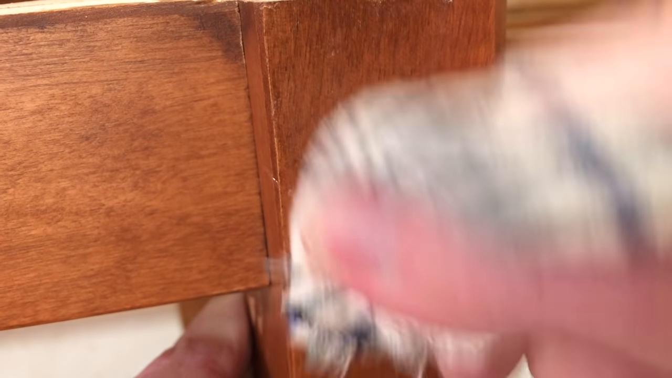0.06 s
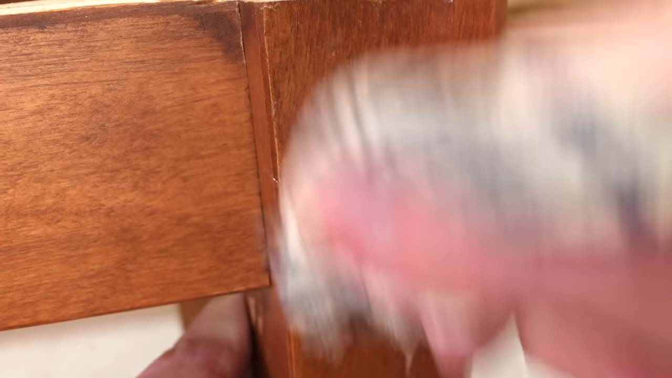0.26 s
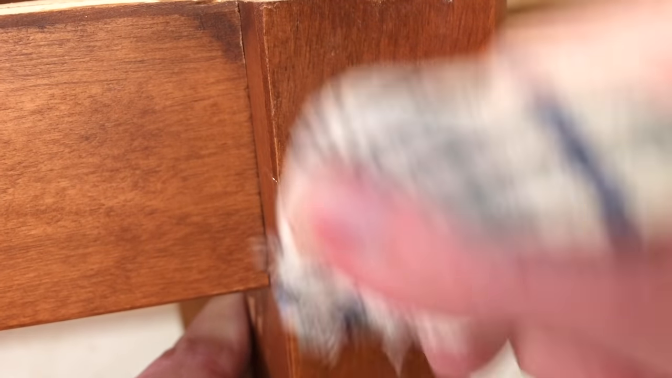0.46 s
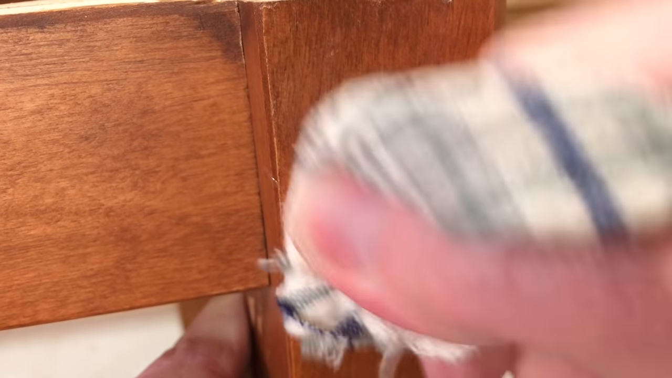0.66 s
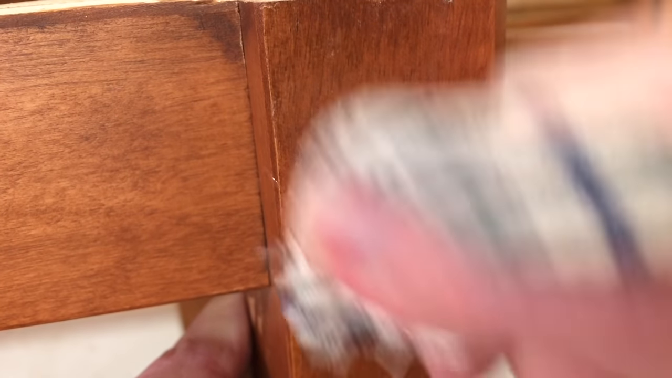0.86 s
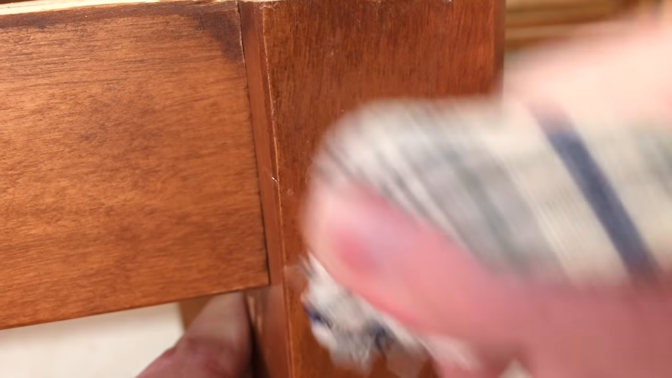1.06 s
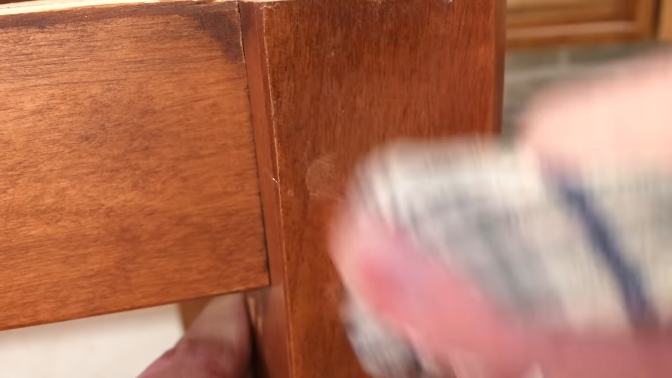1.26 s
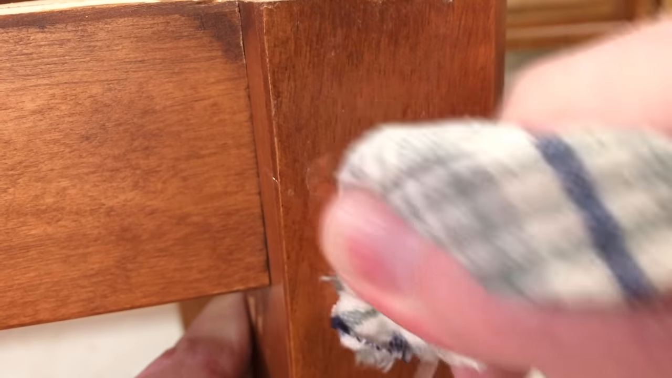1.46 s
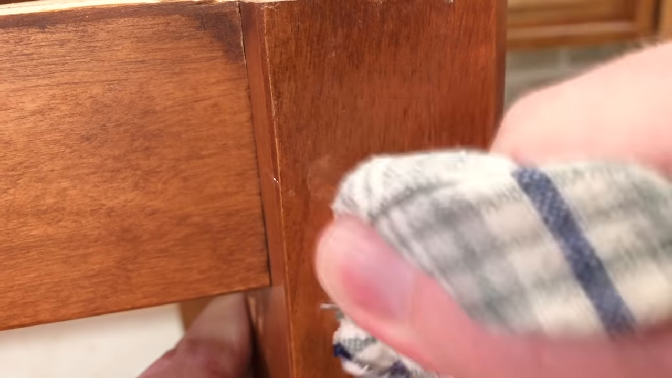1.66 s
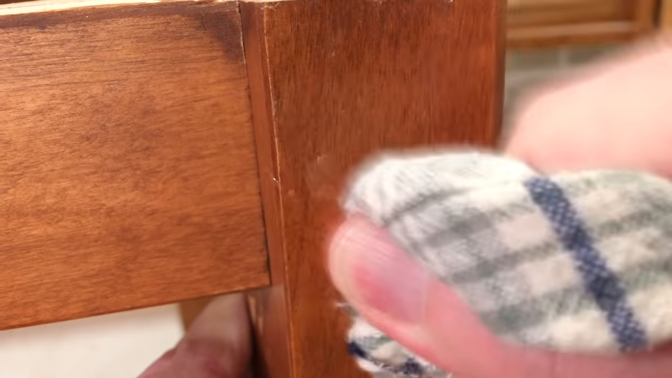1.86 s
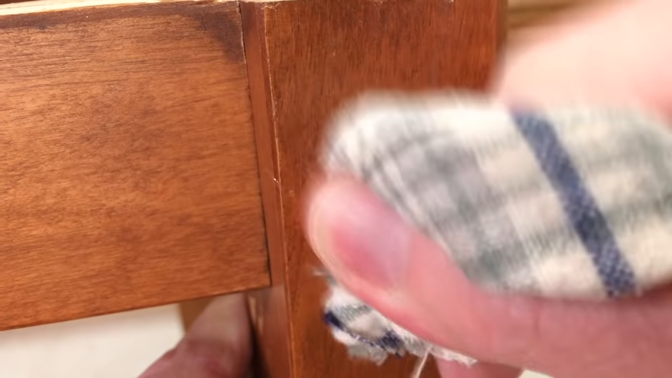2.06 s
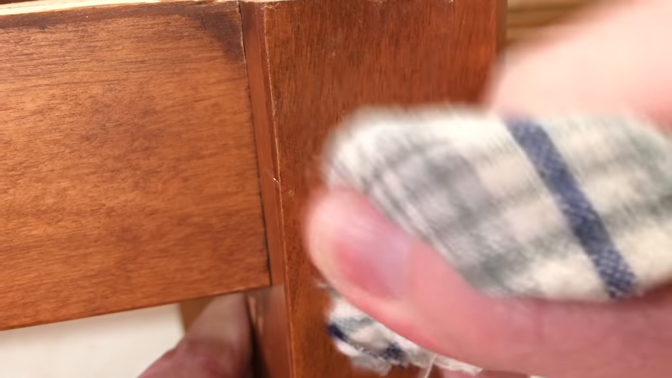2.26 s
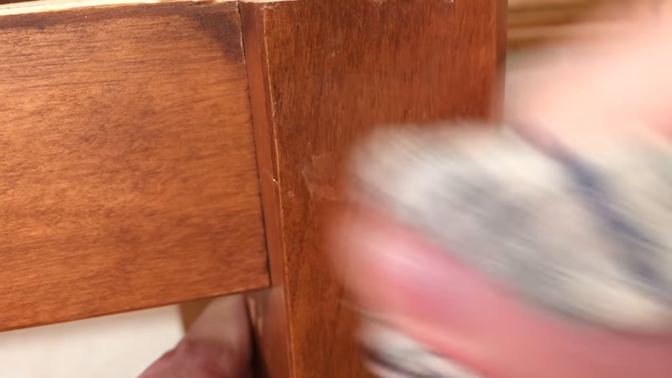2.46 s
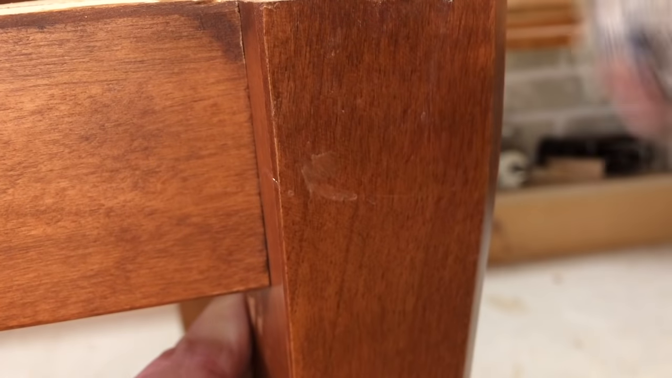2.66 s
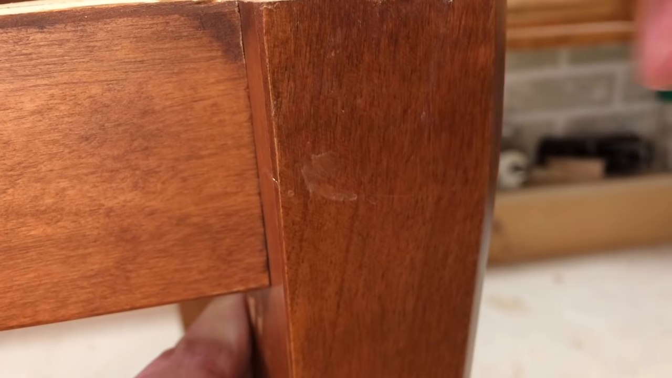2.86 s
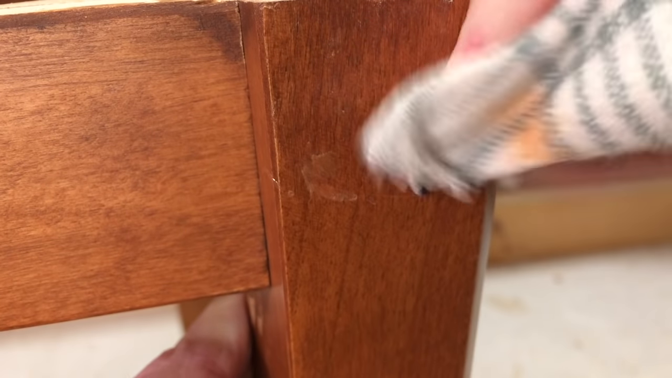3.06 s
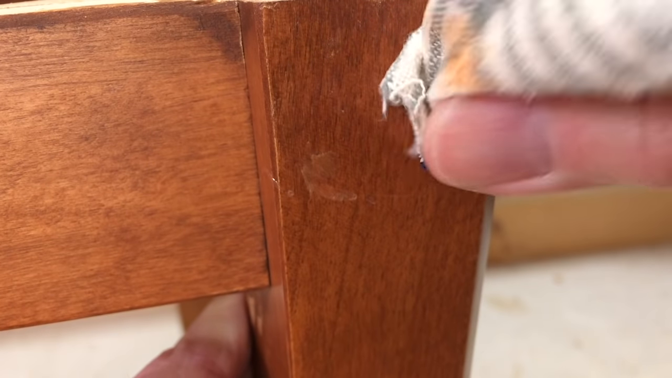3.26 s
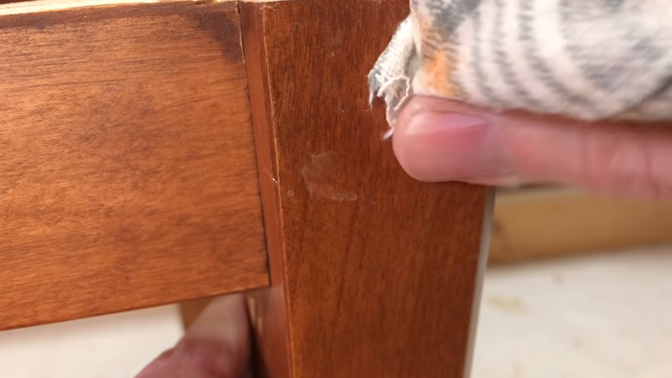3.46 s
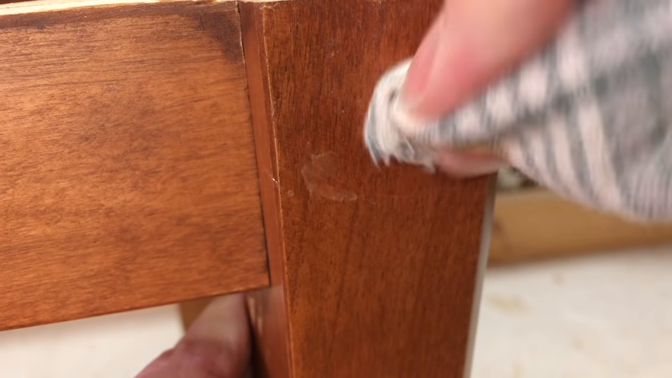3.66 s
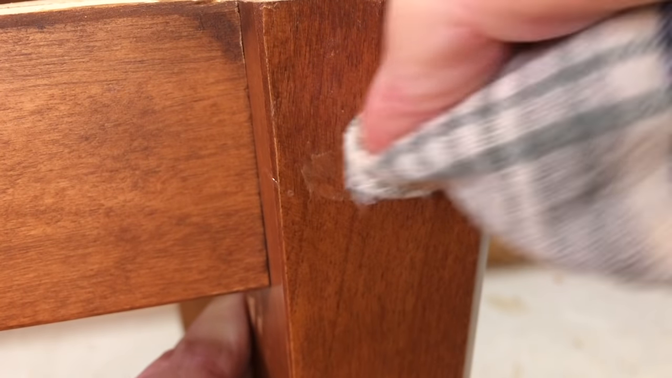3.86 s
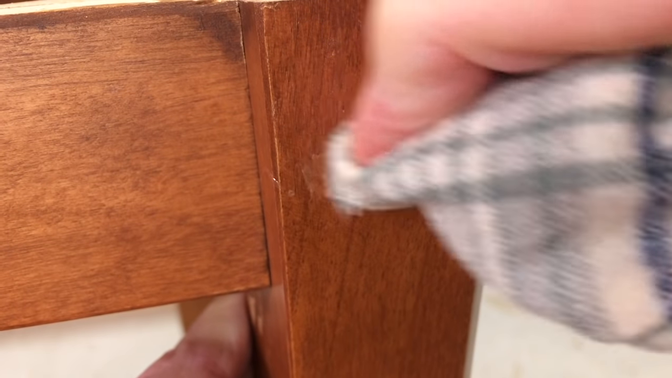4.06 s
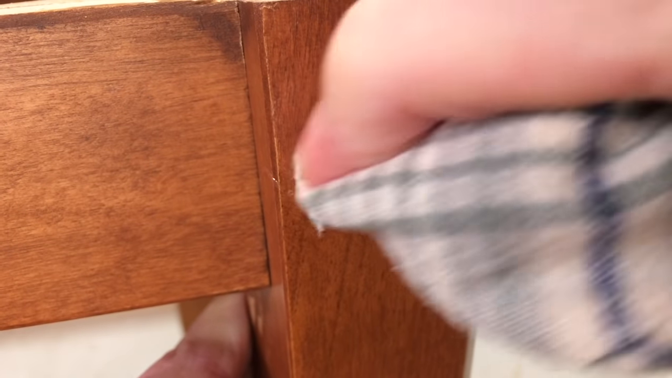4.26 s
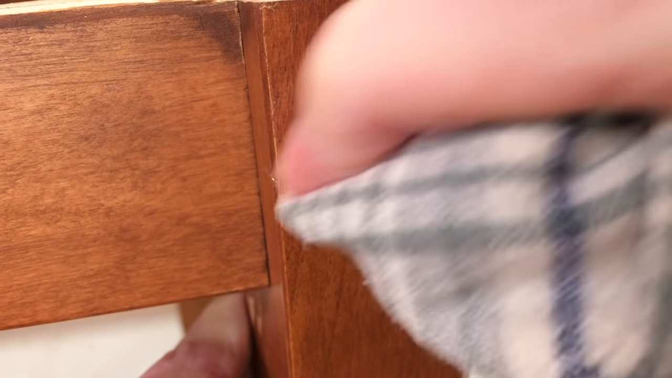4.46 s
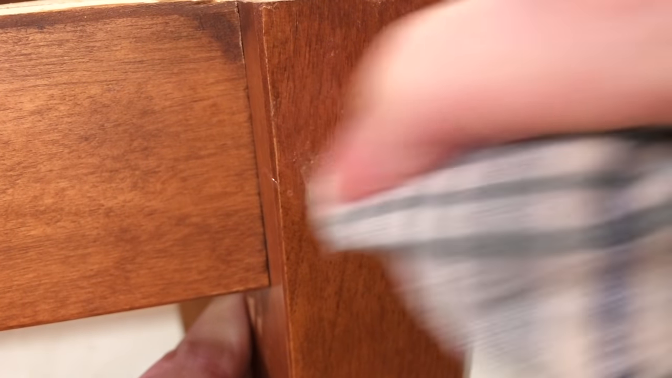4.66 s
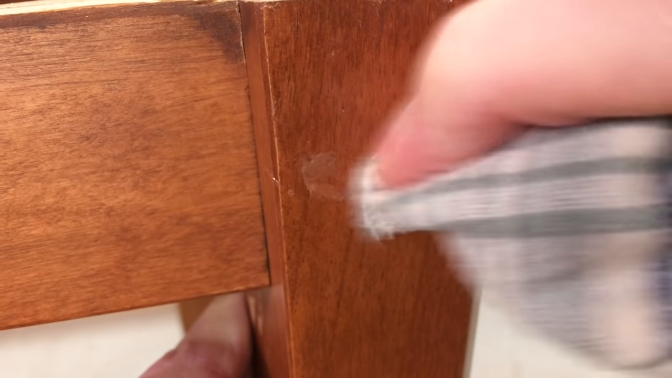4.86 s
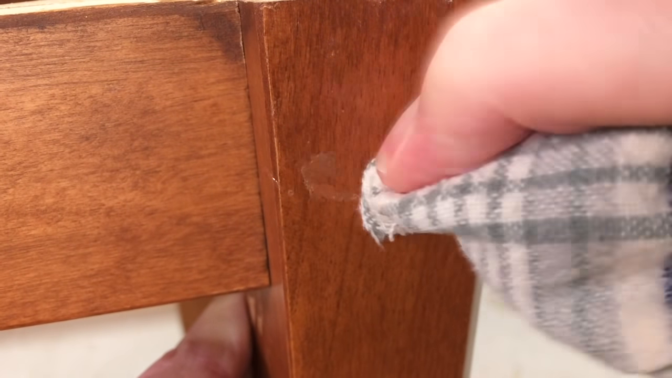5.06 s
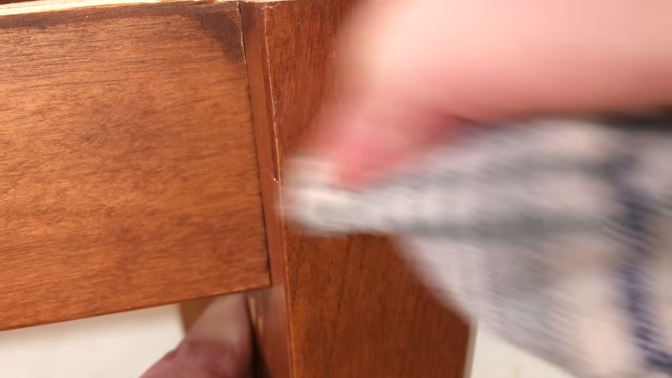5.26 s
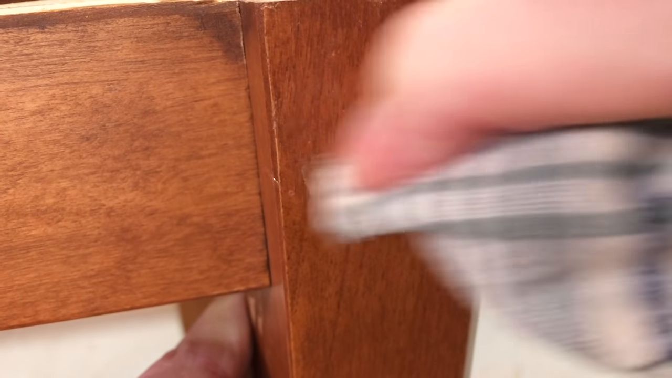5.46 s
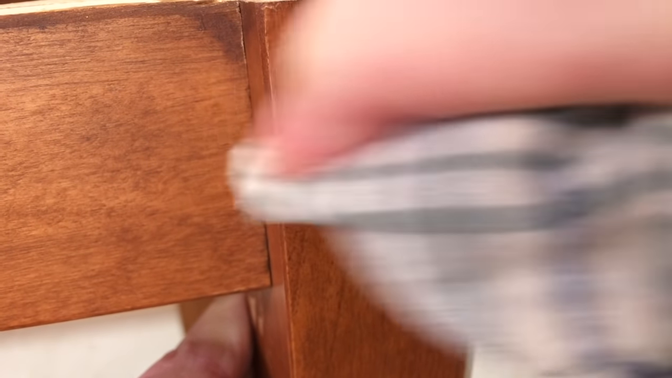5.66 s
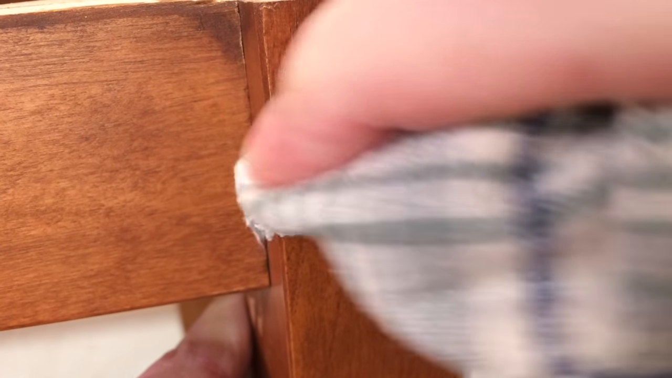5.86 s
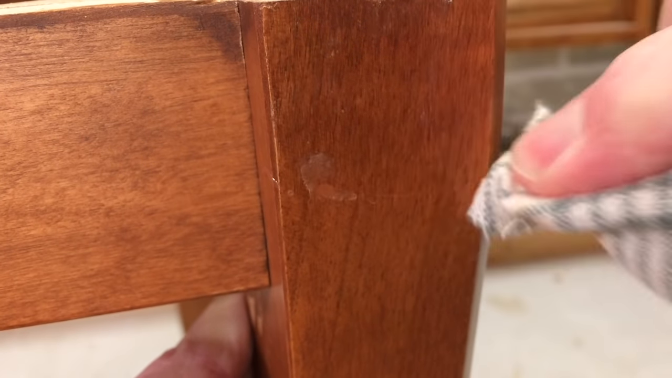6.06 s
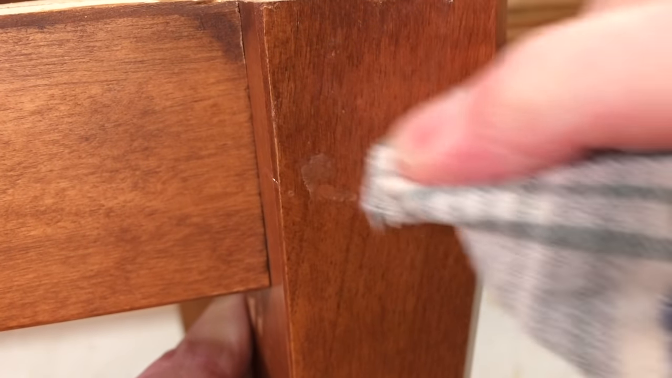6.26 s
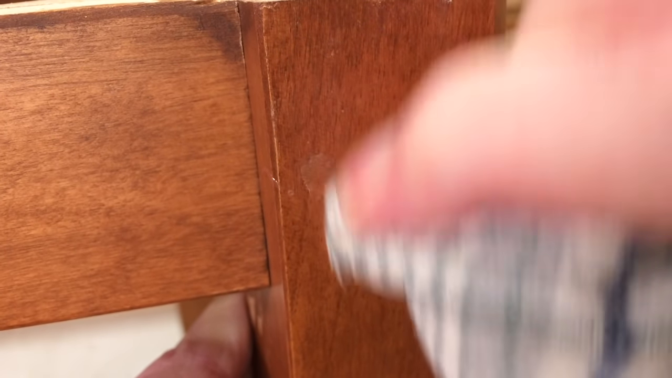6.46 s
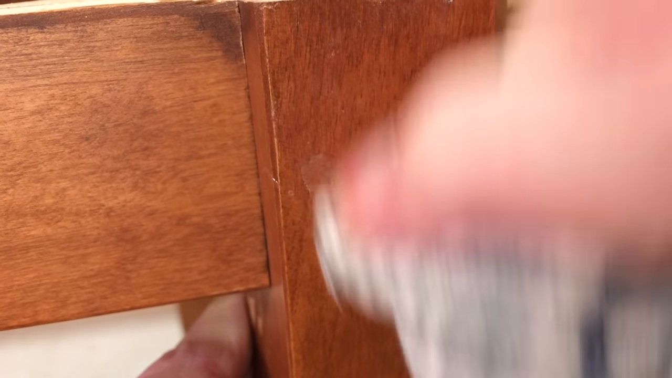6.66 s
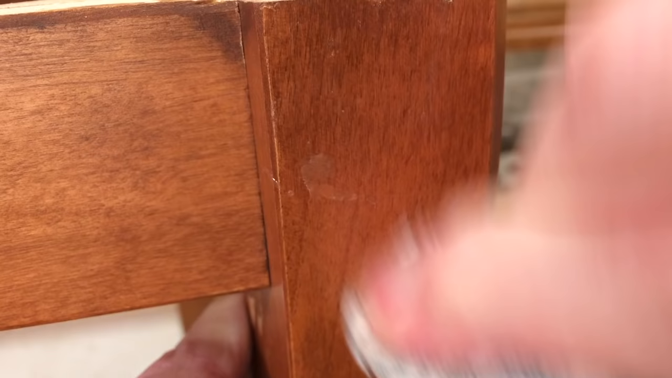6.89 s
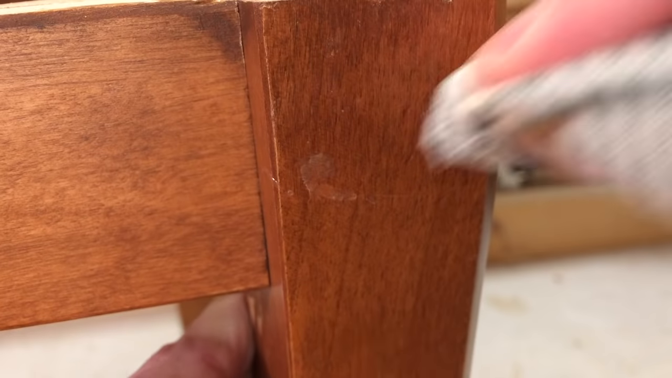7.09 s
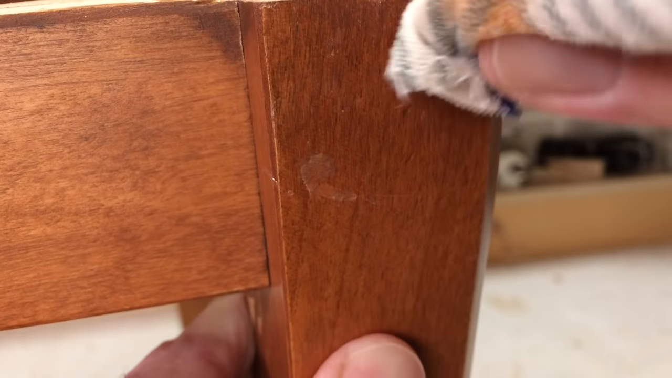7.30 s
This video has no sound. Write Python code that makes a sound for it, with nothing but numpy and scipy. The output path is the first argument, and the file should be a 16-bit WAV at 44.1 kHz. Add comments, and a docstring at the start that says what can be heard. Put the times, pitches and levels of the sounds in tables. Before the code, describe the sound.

A cotton rag rubs rapidly back and forth on a wooden chair leg in three bouts, hissing and scraping, with dull bumps.

```python
"""Buffing a chair leg

A quiet workshop, the microphone close to a varnished chair leg buffed with a bunched cotton rag.
Each stroke hisses in the weave and scrapes the wood into ringing; the cloth groans and squeaks.
The frame judders and bumps under the hand, which also fans slow waves of air at the microphone.
Midway the rag is regripped, with light brushes and taps, then one finger works it over a small spot."""
import sys
import numpy as np
from scipy import signal
from scipy.fft import rfft, irfft
from scipy.io import wavfile

SR = 44100
rng = np.random.default_rng(int(sys.argv[2]) if len(sys.argv) > 2 else 0)


def inscribe(sig):
    """Save sig as 16-bit PCM at rate SR to the path in sys.argv[1].

    A 1-D sig is mono; a 2-D sig holds one channel per row.
    Samples are clipped to [-1, 1] before scaling.
    """
    pcm = np.round(np.clip(np.atleast_2d(sig).T, -1, 1) * 32767)
    wavfile.write(sys.argv[1], SR, pcm.astype(np.int16))


N = 323253
TIME = np.arange(N) / SR


def from_db(db):
    """Decibels to gain."""
    return 10 ** (np.asarray(db) / 20)


def unit_rms(x):
    """Scale to an rms of 1."""
    return x / np.sqrt(np.mean(x ** 2) + 1e-20)


def in_time(rows):
    """Join (time, value) points by straight lines."""
    return np.interp(TIME, *np.transpose(rows))


def butter(x, hz, kind="low", order=2):
    """Butterworth filter."""
    return signal.sosfilt(signal.butter(order, hz, kind, fs=SR, output="sos"), x)


def colour(x, spectrum):
    """Give a steady signal a smooth spectrum; rms 1."""
    hz, db = np.transpose(spectrum)
    bins = np.maximum(np.fft.rfftfreq(N, 1 / SR), 1)
    gain = from_db(np.interp(np.log(bins), np.log(hz), db))
    return unit_rms(irfft(rfft(x) * gain, N))


def drift(per_s):
    """A random curve with a spread near 1."""
    points = rng.standard_normal(N // 10)
    return np.interp(TIME * per_s, np.arange(len(points)), points)


def waver(swing_db, per_s):
    """A gain that wanders up and down by at most swing_db."""
    return from_db(swing_db * np.tanh(drift(per_s)))


def snags(per_s, spread_db=0):
    """Threads catch and let go: random clicks, uneven in size if given a spread."""
    sizes = from_db(spread_db * np.minimum(rng.exponential(1, N), 4))
    signs = rng.choice([-1, 1], N)
    return unit_rms(sizes * signs * (rng.random(N) < per_s / SR))


def swell(start, length, skew):
    """Speed through one stroke: zero at both turns, fastest early if skew is under 1."""
    speed = np.zeros(N)
    during = slice(*np.searchsorted(TIME, [start, start + length]))
    progress = (TIME[during] - start) / length
    speed[during] = np.abs(np.sin(np.pi * progress ** skew))
    return speed


# Room tone of the workshop: (frequency [Hz], relative level [dB])
ROOM_SPECTRUM = [(60, 2), (110, -7.5), (180, -8.5), (240, -10.5), (330, -16), (900, -20), (1400, -24),
                 (3000, -30.5), (10000, -38.5), (15500, -41)]


def room_tone(level_db):
    """The workshop's steady, low hush behind the close sounds."""
    return from_db(level_db) * colour(rng.standard_normal(N), ROOM_SPECTRUM)


# Air stirred by the hand, at the microphone: (time [s], relative level [dB])
DRAUGHT_LEVEL = [(0.05, -30.5), (2.5, -35), (3.4, -44.5), (4.1, -36.5), (5.3, -30.5), (6.1, -37),
                 (7.28, -37.5)]
# Rumble of its eddies: (frequency [Hz], relative level [dB])
EDDY_SPECTRUM = [(8, 13.5), (20, 0), (39, -18), (64, -24.5), (120, -39), (300, -101)]


def fanned_air(push, smooth_hz, eddies_db, gust_db):
    """The hand pushes and pulls the air at the microphone; the eddies shift by gust_db at full push."""
    wave = signal.sosfiltfilt(signal.butter(2, smooth_hz, fs=SR, output="sos"), push)
    effort = np.abs(push) / np.abs(push).max()
    eddies = colour(rng.standard_normal(N), EDDY_SPECTRUM)
    return wave + from_db(in_time(DRAUGHT_LEVEL) + eddies_db + gust_db * effort) * eddies


def ring(x, hz, t60):
    """One mode: a unit click starts a decaying sine of height 1."""
    radius, angle = from_db(-60 / (t60 * SR)), 2 * np.pi * hz / SR
    return signal.lfilter([0, np.sin(angle)], [1, -2 * radius * np.cos(angle), radius ** 2], x + 1e-18)


# Modes of the chair: (frequency [Hz], relative level [dB], t60 before hand damping [s])
CHAIR_MODES = [(82.7, -1, 0.44), (104.7, -1.5, 0.47), (138, -2.5, 0.37), (190, -0.5, 0.16),
               (231.9, -3, 0.22), (274, -5.5, 0.11), (333, -7, 0.15), (372.7, -5, 0.13), (455, -8.5, 0.12),
               (586, -12, 0.094), (660, -9, 0.062), (868, -9, 0.04), (1020.5, -9.5, 0.086),
               (1074, -16, 0.076), (2833, -16.5, 0.035), (2968, -18.5, 0.067), (4346, -18.5, 0.037),
               (5000, -21, 0.072)]


def chair(force, damping=1, wander_db=0):
    """The frame rings. A firm hand damps it; a travelling contact favours the modes by turns."""
    out = 0
    for k, (hz, db, t60) in enumerate(CHAIR_MODES):
        coupling = waver(wander_db, per_s=14) if wander_db else 1
        out += (-1) ** k * from_db(db) * ring(force * coupling, hz, t60 / damping)
    return out


# How hard the hand shakes the frame: (time [s], relative level [dB])
SHAKE_LEVEL = [(0.0, -54), (0.77, -61), (2.27, -54), (2.53, -64.5), (3.2, -71.5), (4.99, -64.5),
               (5.74, -60), (6.04, -69), (6.5, -63.5), (7.28, -69.5)]


def judder(speed, gain_db, soft_hz, resting_drag):
    """Uneven drag of the padded hand shakes the low modes, most while it moves."""
    drag = snags(per_s=1000) * waver(7.5, per_s=40) * (resting_drag + np.sqrt(speed))
    return from_db(in_time(SHAKE_LEVEL) + gain_db) * unit_rms(chair(butter(drag, soft_hz)))


# The chair rocks as the hand turns: (time [s], relative force [dB])
ROCKINGS = [(0.03, -36), (0.19, -38), (0.826, -37.5), (1.003, -42.5), (1.495, -33.5), (1.708, -35.5),
            (2.385, -44), (4.637, -30.5), (4.874, -35.5), (5.093, -36.5), (5.336, -39.5), (5.528, -34.5),
            (5.743, -39.5)]


def bumps(gain_db, band_hz, gap_s, lead_db, rebound_db, contacts=6):
    """The chair rocks on its feet: a light touch, a dull knock and a few weaker rebounds."""
    force = np.zeros(N)
    contact_db = np.append(lead_db, rebound_db * np.arange(contacts - 1))
    for knock_s, db in ROCKINGS:
        elapsed = gap_s * np.cumsum(rng.uniform(0.559, 1.5, contacts))
        times = np.maximum(knock_s + elapsed - elapsed[1], 0)  # the second contact is the knock
        force[(times * SR).astype(int)] += from_db(db + contact_db)
    return from_db(gain_db) * chair(butter(force, band_hz, "band"), damping=3.8)


# Three bouts close to the microphone: the whole wad, one fingertip, then a short finish.
# Strokes go up and down in turn: (start [s], length [s], relative hiss [dB], relative scrape [dB])
WAD_BOUT = [(0.042, 0.11, -56, -66), (0.125, 0.14, -56, -56.5), (0.24, 0.11, -53.5, -58.5),
            (0.33, 0.13, -57, -58.5), (0.45, 0.11, -58, -60.5), (0.538, 0.095, -63, -57),
            (0.636, 0.12, -55.5, -65), (0.723, 0.16, -55.5, -60.5), (0.862, 0.11, -56.5, -61),
            (0.953, 0.11, -59, -58), (1.054, 0.12, -56, -59), (1.159, 0.14, -52.5, -60.5),
            (1.293, 0.1, -55.5, -63), (1.395, 0.11, -59.5, -54), (1.503, 0.11, -56.5, -60.5),
            (1.6, 0.13, -57.5, -52.5), (1.718, 0.11, -54.5, -59), (1.814, 0.14, -56, -59.5),
            (1.931, 0.089, -56.5, -58), (2.034, 0.1, -59, -55.5), (2.129, 0.097, -57, -58),
            (2.234, 0.097, -58, -58.5), (2.336, 0.089, -59.5, -59)]
FINGERTIP_BOUT = [(4.203, 0.18, -64, -58), (4.302, 0.16, -65.5, -62.5), (4.449, 0.16, -62.5, -58.0),
                  (4.545, 0.14, -65.5, -58), (4.685, 0.12, -61, -54.5), (4.774, 0.15, -62, -55.5),
                  (4.908, 0.14, -60.5, -56), (4.997, 0.18, -63, -56), (5.151, 0.11, -60.5, -56.5),
                  (5.234, 0.11, -68, -59.5), (5.357, 0.11, -59.5, -56.5), (5.433, 0.17, -63, -54.5),
                  (5.575, 0.12, -60.5, -54.5), (5.672, 0.14, -63.5, -56), (5.804, 0.14, -58.5, -55.5)]
FINISH_BOUT = [(6.335, 0.17, -63.5, -60.5), (6.462, 0.11, -61, -58.5), (6.56, 0.11, -59.5, -58.5),
               (6.657, 0.13, -60.5, -57.5), (6.755, 0.14, -59, -60)]


def strokes(hiss_power, scrape_power, air_lag_s):
    """Hiss gain, scrape gain and push on the air; rubbing sets in fast and levels off as the rag slides."""
    hiss, scrape, push = np.zeros((3, N))

    def rub(bout, push_db, hiss_skew, scrape_skew):
        for k, (start, length, hiss_db, scrape_db) in enumerate(bout):
            hiss[:] += from_db(hiss_db) * np.tanh(2 * swell(start, length, hiss_skew) ** hiss_power)
            scrape[:] += from_db(scrape_db) * np.tanh(2 * swell(start, length, scrape_skew) ** scrape_power)
            push[:] += (-1) ** k * from_db(push_db) * swell(start + air_lag_s, length, skew=0.79) ** 2

    rub(WAD_BOUT, push_db=-10.5, hiss_skew=0.56, scrape_skew=0.77)
    rub(FINGERTIP_BOUT, push_db=-28, hiss_skew=0.54, scrape_skew=0.66)
    rub(FINISH_BOUT, push_db=-23.5, hiss_skew=0.68, scrape_skew=0.69)
    return hiss, scrape, push


def patches(x, low_hz, high_hz):
    """Patches of weave grip and let go, so narrow friction resonances come and go within a stroke."""
    for hz in np.geomspace(low_hz, high_hz, 20):
        band = signal.lfilter(*signal.iirpeak(hz, Q=12, fs=SR), x)
        x = x + (waver(4, per_s=24) - 1) * band
    return unit_rms(x)


def folds(x, split_hz, tilt_db):
    """Different folds of the cloth touch, so the hiss turns now brighter, now duller."""
    low = butter(x, split_hz, order=1)
    tilt = waver(tilt_db, per_s=13)
    return unit_rms(low / tilt + (x - low) * tilt)


def ringing_leg(threads, bend_share):
    """Threads ring the leg; the travelling hand loads it and pulls its modes slightly sharp and flat."""
    modes = chair(threads, damping=1.5, wander_db=2.5)
    bent_time = TIME + np.cumsum(bend_share * drift(per_s=25)) / SR
    bent = np.interp(bent_time, TIME, modes)
    return unit_rms(butter(bent, 650, "high"))


# Fine fibres and coarse threads on varnish, heard close: (frequency [Hz], relative level [dB])
FIBRE_SPECTRUM = [(1000, -8.5), (2200, -4.5), (3500, -4.5), (5000, -2), (7500, -2.5), (10000, -4.5),
                  (12300, -6.5), (14000, -13.5), (16000, -20)]
THREAD_SPECTRUM = [(200, 8.5), (450, 4), (800, -2), (1350, -1), (2400, -4.5), (2900, -4), (3600, -9),
                   (6000, -14), (15000, -41)]
# How hard the palm leans on the rag: (time [s], relative weight [dB])
PALM_WEIGHT = [(0, 1.5), (1.3, 1.5), (2.15, 1.5), (3.5, -1.5)]


def rag(hiss, scrape, hiss_db, scrape_db, wood_db, creep_db):
    """Fibres hiss, threads scrape and ring the leg; the pressed cloth creeps even at the turns."""
    creep = from_db(in_time(SHAKE_LEVEL) / 2 + creep_db)
    weave = patches(colour(snags(per_s=12000), FIBRE_SPECTRUM), low_hz=1740, high_hz=11230)
    fibres = folds(weave, split_hz=4600, tilt_db=1.5) * waver(1.5, per_s=150)
    threads = snags(per_s=5000, spread_db=1.5) * waver(3.5, per_s=110)
    wood = ringing_leg(threads, bend_share=0.014)
    rasp = patches(colour(threads, THREAD_SPECTRUM), low_hz=595, high_hz=4520)
    # the whole wad drives the wood harder and muffles its own scrape; a fingertip does not
    palm = from_db(in_time(PALM_WEIGHT))
    hissing = from_db(hiss_db) * np.hypot(hiss, 0.87 * creep) * fibres
    scraping = from_db(scrape_db) / palm * np.hypot(scrape, creep) * rasp
    ringing = from_db(wood_db) * palm ** 2 * scrape * wood
    return hissing + scraping + ringing


# Panels and the bench top near the microphone throw the sound back: (delay [s], gain [dB])
REFLECTIONS = [(.0053, -22), (.0092, -12.5), (0.0176, -12)]


def near_echoes(x):
    """Short echoes give the rubbing a slightly hollow, boxed-in colour."""
    return x + sum(from_db(db) * np.interp(TIME - delay, TIME, x, left=0) for delay, db in REFLECTIONS)


# The rag groans on the leg: (start [s], length [s], slip rate [Hz], relative level [dB])
SLIP_RUNS = [(0.156, 0.27, 222, -50.5), (0.38, 0.1, 236, -44.5), (1.192, 0.12, 237, -46),
             (1.857, 0.064, 595, -56), (2.049, 0.4, 230, -54), (3.775, 0.23, 410, -65),
             (6.317, 0.31, 235, -61), (6.608, 0.067, 405, -53), (6.683, 0.1, 250, -51),
             (6.795, 0.086, 575, -57.5)]


def groans(gain_db, overtone_db, jitter, rough_db):
    """Stick and slip locks briefly into a raspy tone: every slip differs in length and strength."""
    out = np.zeros(N)
    for start, length, hz, db in SLIP_RUNS:
        phase = 2 * np.pi * hz * np.cumsum(1 + jitter * drift(hz)) / SR
        tone = np.sin(phase) + from_db(overtone_db) * np.sin(2 * phase)
        slips = tone * waver(rough_db, per_s=hz / 2)
        out += from_db(db + gain_db) * swell(start, length, skew=0.49) * slips
    return out


# The cloth catches in a rough scuff: (start [s], level [dB])
CATCHES = [(0.175, -54.5), (2.495, -63.5), (4.975, -54), (5.952, -54)]


def scuffs(band_hz, length_s):
    """A quick run of coarse snags where the cloth bunches up."""
    coarse = unit_rms(butter(snags(per_s=750, spread_db=3.5), band_hz, "band"))
    return coarse * sum(from_db(db) * swell(start, length_s, skew=0.55) for start, db in CATCHES)


# Squeaks, faint even this close: (start [s], length [s], pitch [Hz], width [Hz], relative level [dB])
VARNISH_SQUEAKS = [(0.178, 0.11, 1650, 500, -60.5), (0.358, 0.13, 1620, 445, -63.5),
                   (0.534, 0.19, 1390, 600, -65), (3.785, 0.19, 1690, 300, -74),
                   (3.873, 0.04, 1727, 25, -66)]


def squeaks(gain_db, upper_ratio, upper_db):
    """Threads chatter on the varnish in an unsteady band with a weaker one above it."""
    out = np.zeros(N)
    for start, length, hz, width_hz, db in VARNISH_SQUEAKS:
        chatter = rng.standard_normal(N)
        main, upper = (unit_rms(signal.lfilter(*signal.iirpeak(f, f / width_hz, fs=SR), chatter))
                       for f in (hz, hz * upper_ratio))
        squeak = main + from_db(upper_db) * upper
        out += from_db(db + gain_db) * swell(start, length, skew=0.81) * squeak
    return out


# Fingernail and hem tap the wood: (time [s], pulse peak [dB], centre [Hz], knock against pulse [dB])
WOOD_TAPS = [(1.402, -52, 1240, 0.5), (2.939, -39, 7700, -30), (3.616, -50, 610, -3), (3.665, -47, 845, -6),
             (3.687, -51, 850, -2), (3.714, -51.5, 1500, -7), (4.031, -36, 820, -13),
             (4.284, -43, 280, -39), (4.764, -44, 900, -14), (5.001, -44, 900, -6), (5.698, -48.5, 800, 1),
             (5.978, -42.5, 595, -6)]


def taps(band_ratio, damping):
    """Each tap is one dry pulse, duller for a softer contact, and a brief knock of the held wood."""
    out, blow = np.zeros(N), signal.unit_impulse(4000)
    for start, db, hz, knock_db in WOOD_TAPS:
        pulse = butter(blow, [hz / band_ratio, min(hz * band_ratio, SR / 3)], "band", order=3)
        knock = chair(pulse, damping)
        tap = pulse / np.abs(pulse).max() + from_db(knock_db) * knock / np.abs(knock).max()
        out[int(start * SR):][:len(tap)] += from_db(db) * tap
    return out


# Light touches after each bout: (start [s], length [s], relative hiss [dB], relative scrape [dB])
LIGHT_BRUSHES = [(2.559, 0.12, -66, -76), (2.773, 0.044, -67.5, -68.5), (2.974, 0.054, -61.5, -66),
                 (3.352, 0.083, -67, -64.5), (3.53, 0.15, -66.5, -67), (3.66, 0.34, -74.5, -65.5),
                 (3.951, 0.21, -67.5, -58.5), (5.863, 0.23, -76, -63), (6.076, 0.18, -70, -68),
                 (6.88, 0.1, -73, -62), (7.053, 0.14, -75, -72)]


def brushes(skew):
    """Hiss gain and scrape gain as the rag grazes the leg; both follow its speed."""
    hiss, scrape = np.zeros((2, N))
    for start, length, hiss_db, scrape_db in LIGHT_BRUSHES:
        speed = swell(start, length, skew)
        hiss += from_db(hiss_db) * speed
        scrape += from_db(scrape_db) * speed
    return hiss, scrape


def scene():
    """Rag, chair and air at one close microphone, over the workshop's room tone."""
    hiss, scrape, push = strokes(hiss_power=3.26, scrape_power=2.58, air_lag_s=0.01)
    light_hiss, light_scrape = brushes(skew=0.97)
    cloth = rag(hiss + light_hiss, scrape + light_scrape,
                hiss_db=-2.5, scrape_db=-2, wood_db=-3, creep_db=-39.5)
    frame = judder(scrape / scrape.max(), gain_db=7, soft_hz=434, resting_drag=0.21)
    frame += bumps(gain_db=4.5, band_hz=(112.7, 364), gap_s=0.014, lead_db=-9.5, rebound_db=-2.5)
    cloth += groans(gain_db=4, overtone_db=-15, jitter=0.1, rough_db=3.5)
    cloth += squeaks(gain_db=0.5, upper_ratio=1.9, upper_db=-18)
    handling = taps(band_ratio=2.98, damping=7) + scuffs(band_hz=(510, 1320), length_s=0.053)
    room = room_tone(level_db=-62.5)
    air = fanned_air(push, smooth_hz=31.3, eddies_db=15, gust_db=-1)
    return (near_echoes(cloth) + frame + handling + room + air)[None]


def record(dry):
    """The treble is cut steeply above 15.7 kHz."""
    return signal.sosfilt(signal.ellip(10, .1, 80, 15700, fs=SR, output="sos"), dry)


dry = scene()
out = record(dry)
inscribe(out)
```